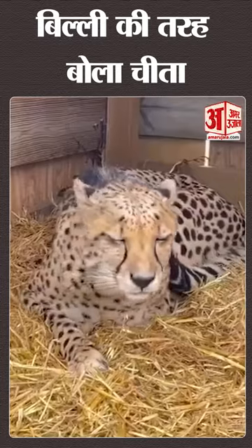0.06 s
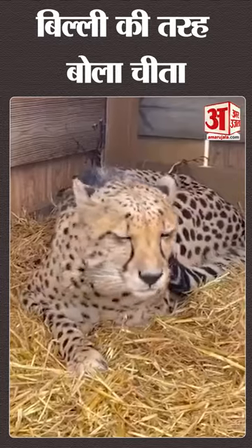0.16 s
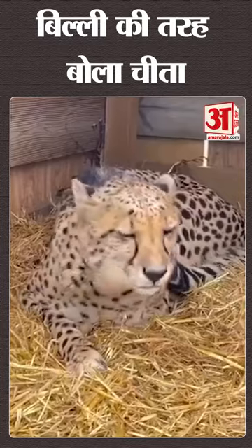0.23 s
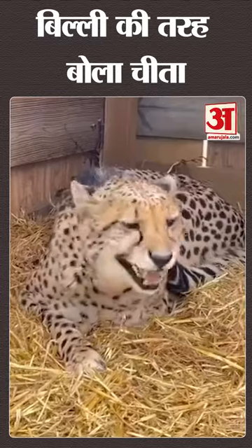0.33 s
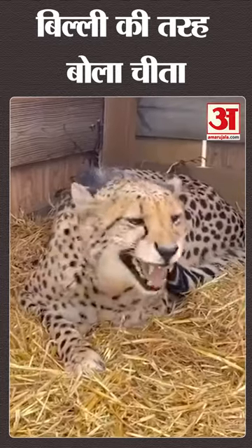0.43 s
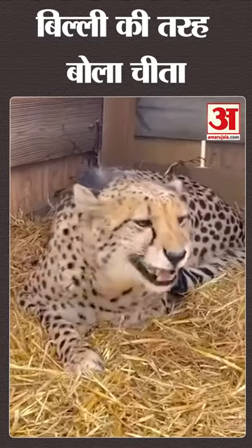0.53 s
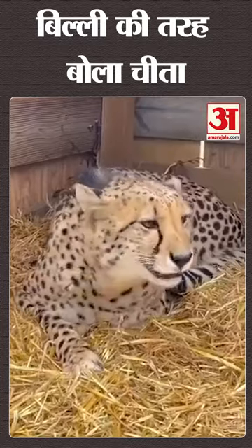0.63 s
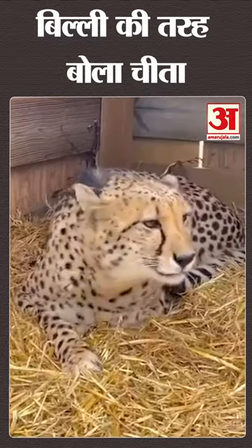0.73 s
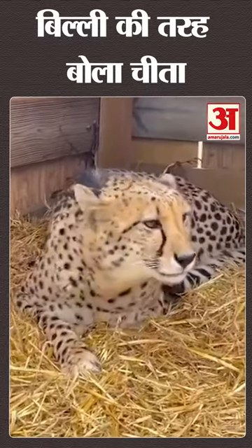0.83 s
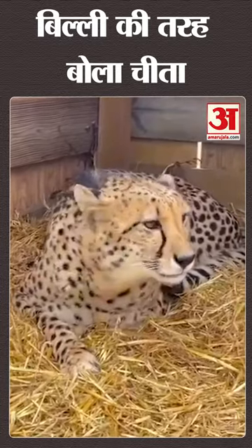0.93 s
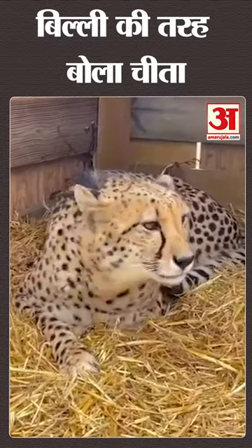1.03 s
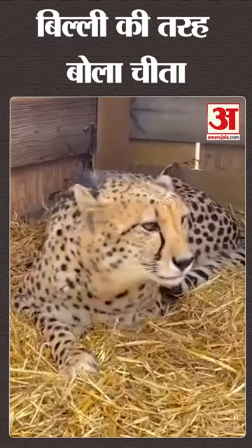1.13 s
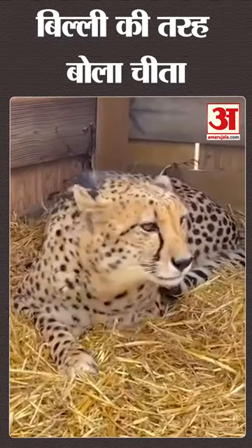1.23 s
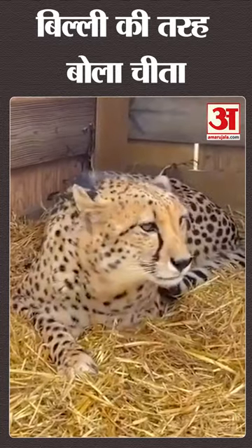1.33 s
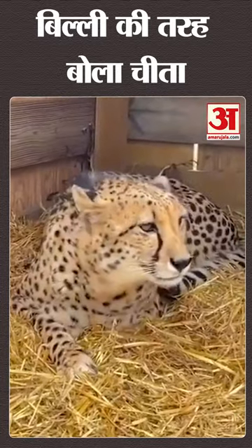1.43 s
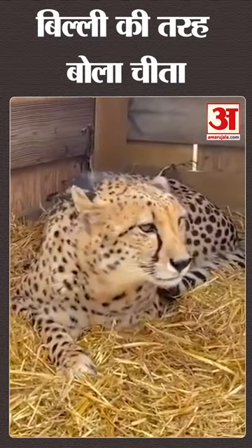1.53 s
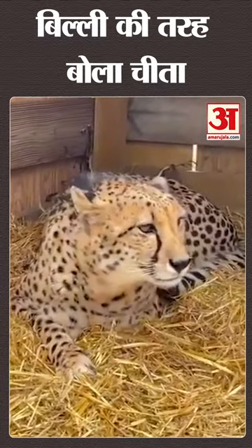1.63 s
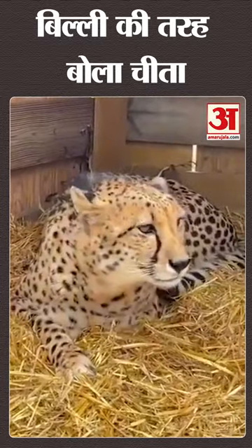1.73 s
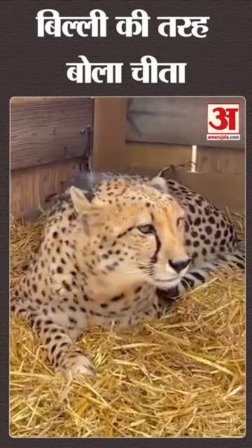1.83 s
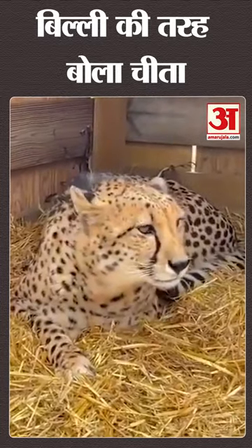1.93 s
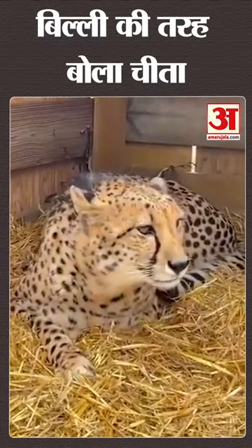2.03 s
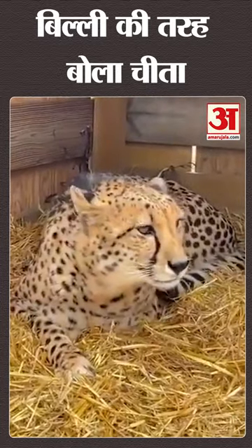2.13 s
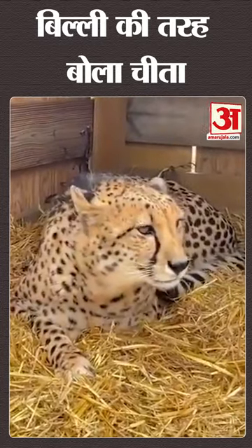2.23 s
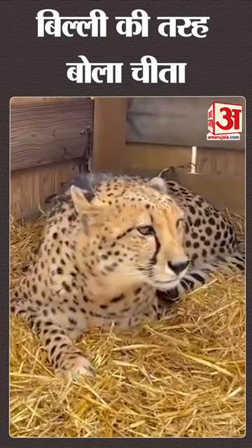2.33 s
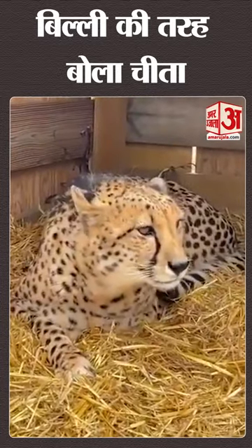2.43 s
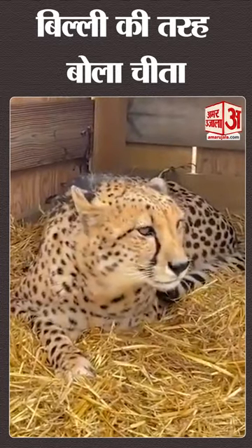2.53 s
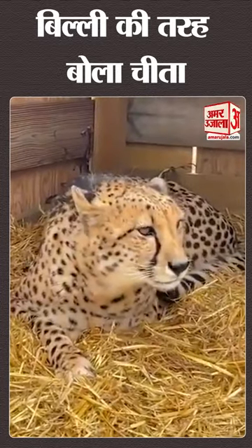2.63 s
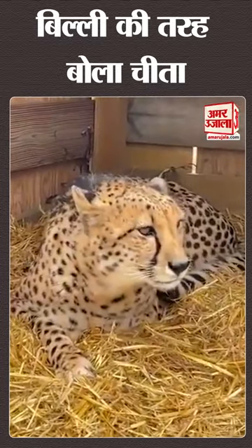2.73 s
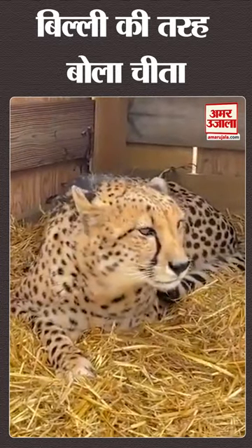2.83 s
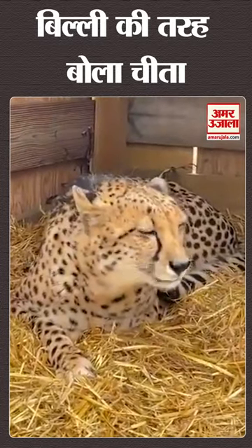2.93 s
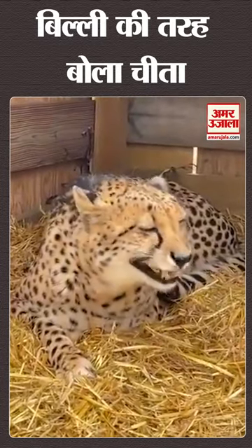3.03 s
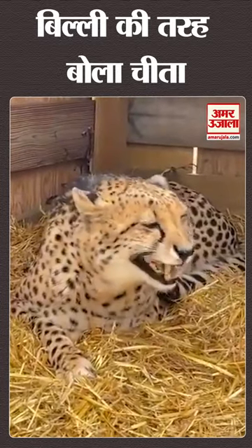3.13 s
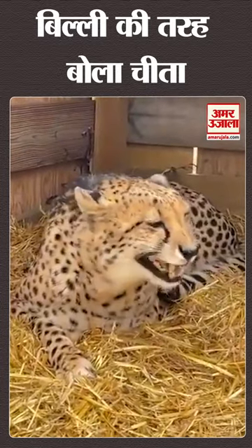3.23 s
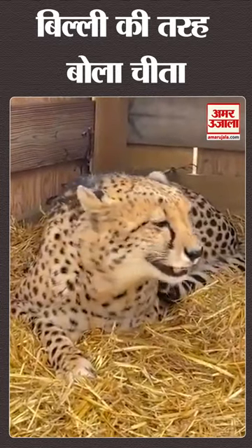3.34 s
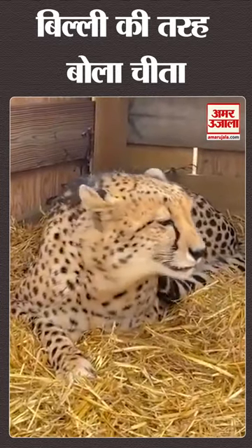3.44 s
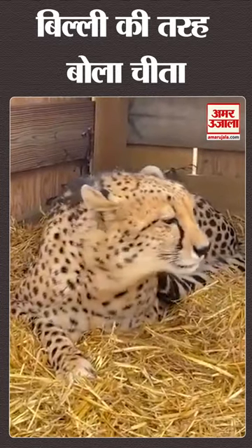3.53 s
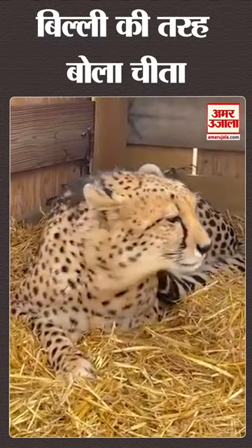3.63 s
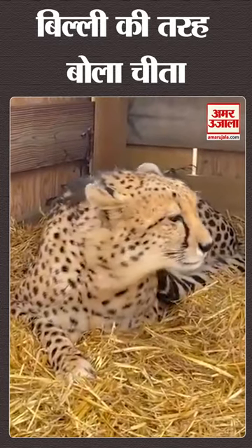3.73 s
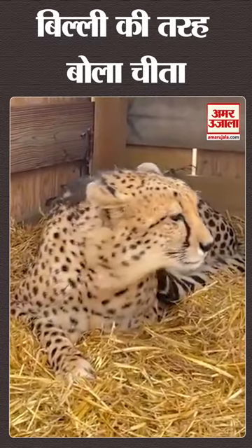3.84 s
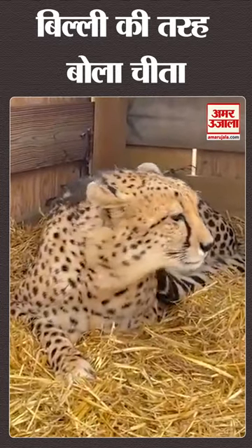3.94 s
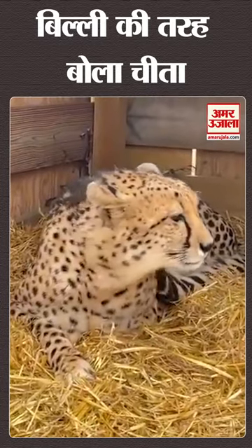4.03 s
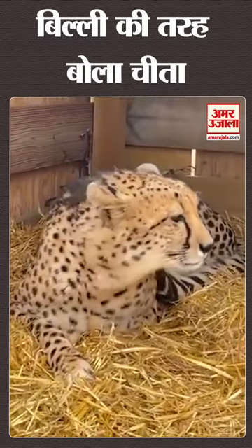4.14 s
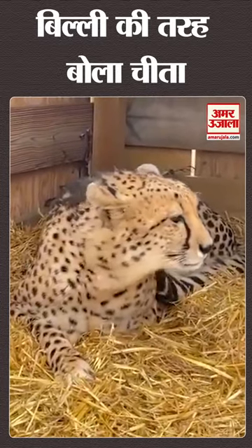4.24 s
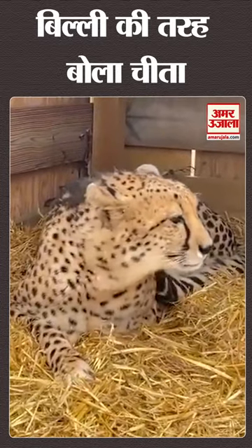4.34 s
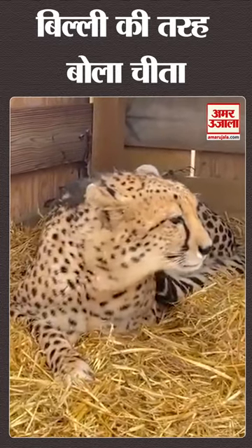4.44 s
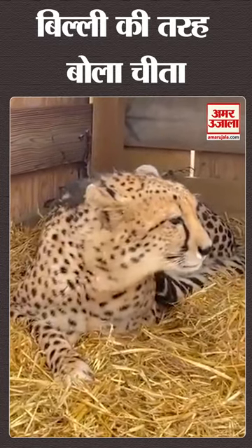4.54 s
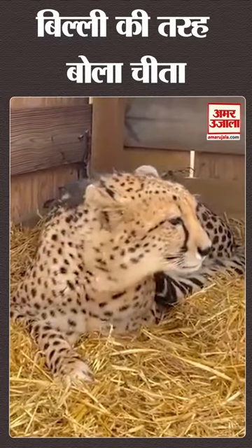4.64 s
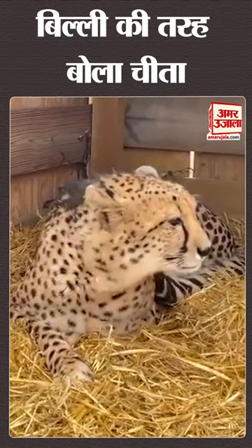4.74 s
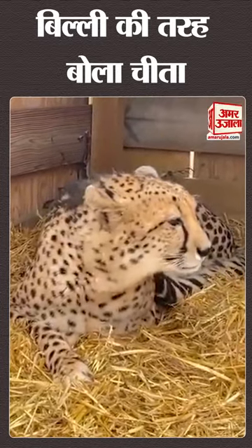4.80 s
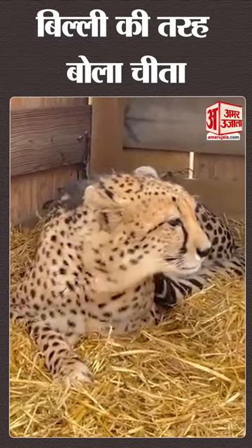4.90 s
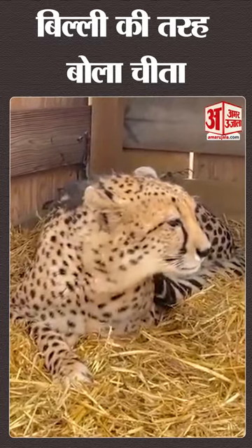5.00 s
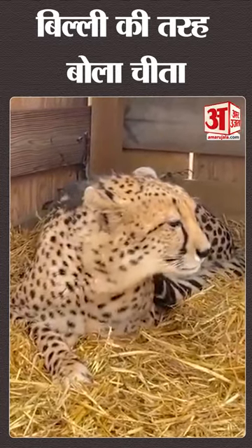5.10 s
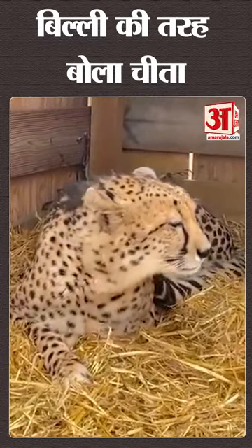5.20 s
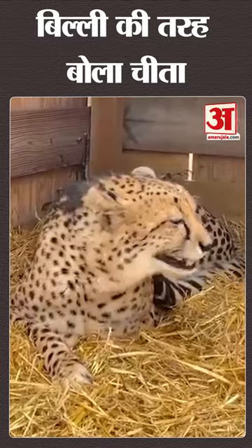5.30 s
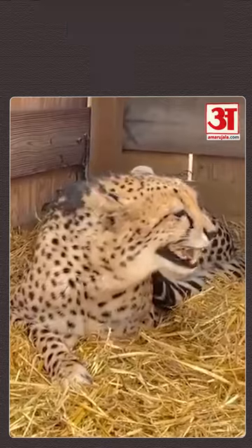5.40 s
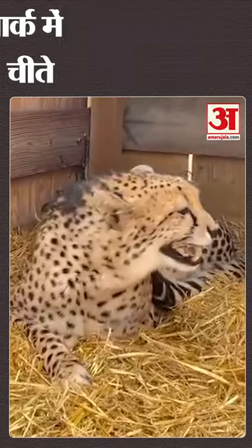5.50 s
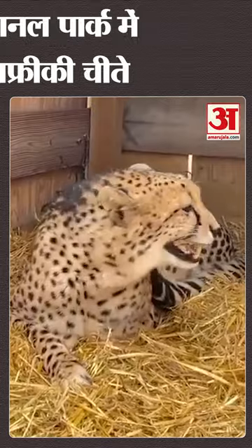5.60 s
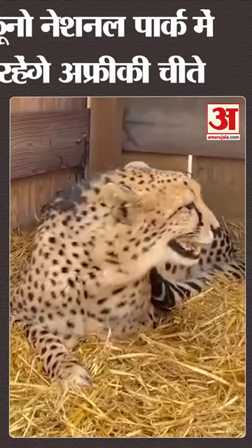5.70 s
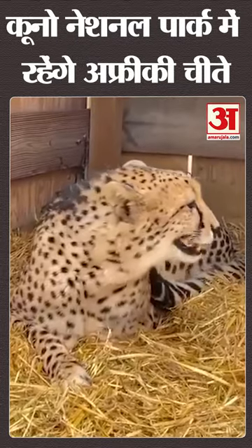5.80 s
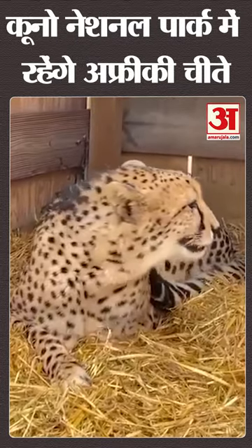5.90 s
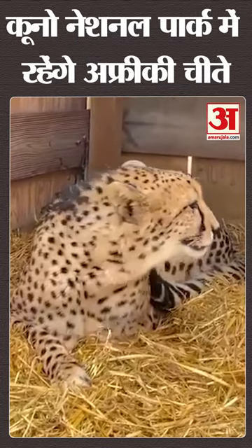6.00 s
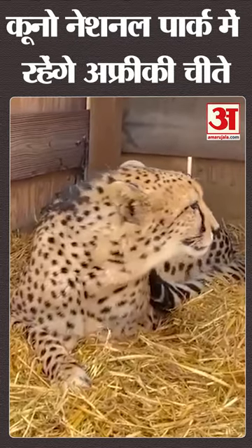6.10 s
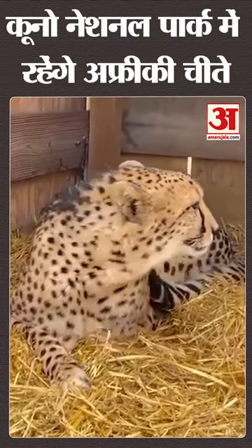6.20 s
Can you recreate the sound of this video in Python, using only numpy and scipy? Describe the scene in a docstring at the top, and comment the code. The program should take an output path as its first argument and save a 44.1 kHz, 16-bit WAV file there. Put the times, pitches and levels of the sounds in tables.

```python
"""A cheetah meows in a stall

A cheetah lying on straw gives three thin meows, each arching and then sliding down as its mouth closes.
Its vocal folds make a tone, its breath adds a rasp, and its throat and mouth shape both.
Beneath them a muffled rumble, most likely an engine beyond the wall, runs down from a drone
to a slow thudding idle. The straw stirs faintly, and the wooden boards throw the calls back."""
import sys
import numpy as np
from scipy import signal
from scipy.fft import rfft, irfft
from scipy.io import wavfile
from scipy.ndimage import uniform_filter1d

SR = 44100
rng = np.random.default_rng(int(sys.argv[2]) if len(sys.argv) > 2 else 0)


def transcribe(u):
    """Save the signal u as a 16-bit wav file named by the first command-line argument.

    u: samples, shape (n,) or (channels, n), limited to [-1, 1]; the rate is SR.
    q: integer samples, one column per channel.
    """
    v = np.clip(np.atleast_2d(u).T, -1, 1)
    q = np.round(v * 32767).astype(np.int16)
    wavfile.write(sys.argv[1], SR, q)


N = 276066
TIME = np.arange(N) / SR
TOP_HZ = 13100
USUAL_HZ, USUAL_DB = 600, -20  # pitch and level of an ordinary meow

# The engine slowing to idle: time_s, cycles_per_s
ENGINE_SPEED = [(0, 30.2), (.15, 28.6), (2.15, 21.0), (3.3, 13.75), (4.0, 11.52), (5.0, 10.17),
                (6.26, 10.13)]
# Tones at 2 to 6 times the engine speed, before the building shapes them: level_db
DRONE_LEVELS = [-25.5, -26, -20.5, -21.5, -31]
# What comes through the wall: frequency_hz, gain_db
THROUGH_WALL = [(15, -52.5), (30, -20.5), (50, -3.5), (85, -1.5), (105, -7), (130, -9), (165, -21),
                (230, -23), (350, -43.5), (700, -73.5), (2000, -102)]
# A broad rush that dies away as the engine slows: time_s, level_db
RUSH_FADE = [(0, -40), (1.05, -43), (2.0, -59.5), (3.6, -63), (6.26, -81)]
# The colour of that rush: frequency_hz, gain_db
RUSH_SPECTRUM = [(60, -18), (200, 5), (300, 0), (500, -14.5), (750, -22.5), (1500, -23.5), (2200, -28.5),
                 (3200, -39), (7000, -51.5), (13000, -61)]
# The colour of the still air: frequency_hz, gain_db
AIR_SPECTRUM = [(100, -4.5), (500, 1.5), (900, -5.5), (1500, -6), (2300, -10.5), (4500, -13), (7000, -15),
                (9000, -20), (11300, -14.5), (13000, -27)]
# Each stir of the straw: start_s, length_s, level_db, centre_hz, width_octaves
STRAW_STIRS = [(0.278, 0.021, -45.5, 635, 0.53), (2.597, 0.5, -68, 1190, 0.17),
               (3.013, 0.12, -54.5, 11870, 0.12), (3.246, 0.2546, -60.5, 11870, 0.1),
               (5.646, 0.026, -51, 292, 0.7)]
# How long the stall's echo takes to fall by 60 dB: frequency_hz, decay_s
ECHO_DECAY = [(300, 0.3), (1200, 0.3), (3000, 0.26), (8000, 0.24)]
# The tune of the meows, one list each: time_s, pitch_hz
MEOW_PITCH = [
    [(0.666, 812), (0.695, 734.4), (0.73, 834), (0.762, 813.6), (0.805, 657), (0.87, 554.3), (0.975, 684.6),
     (1, 662), (1.025, 554)],
    [(3.308, 566.3), (3.35, 550.3), (3.405, 654.4), (3.48, 690.6), (3.56, 607), (3.62, 552.8), (3.69, 534),
     (3.77, 496), (3.81, 418.7)],
    [(5.672, 749), (5.693, 623.5), (5.742, 766.6), (5.8, 676), (5.87, 600), (5.94, 565.8), (6.01, 550),
     (6.15, 535.3), (6.26, 412.6)],
]
# How hard the cat calls, one list per meow: time_s, level_db, mouth_opening (0 shut, 1 wide)
MEOW_EFFORT = [
    [(0.666, -44.5, 1), (0.678, -30.5, 0.8), (0.735, -21.5, 0.95), (0.782, -16.5, 0.87), (0.818, -9, 0.76),
     (0.858, -16.5, 0.62), (0.928, -41, 0.54), (0.99, -36.5, 0.8), (1.03, -35.5, 0.08), (1.07, -57.0, 0.44)],
    [(3.308, -48.5, 0.46), (3.34, -24.5, 0.47), (3.46, -15.5, 0.94), (3.54, -12.5, 0.77),
     (3.69, -16.0, 0.64), (3.753, -32, 0.4), (3.785, -22.0, 0.1), (3.803, -34.5, 0.27), (3.827, -22.5, 0),
     (3.89, -67.5, 0.02)],
    [(5.672, -39, 0.67), (5.705, -19, 0.69), (5.79, -29.5, 0.64), (5.825, -24.5, 0.55), (5.86, -18.5, 0.57),
     (6.09, -18, 0.95), (6.135, -29, 0.32), (6.168, -21.5, 0.42), (6.208, -36, 0.35), (6.245, -18.5, 0.07)],
]
# Each meow's colour: bright_db, ring_db, squeal_hz, squeal_db, rasp_db, extra_starting_rasp_db
MEOW_COLOURS = [(-1, 19.5, 4750, 22.5, -26.5, 3.5), (-2.5, 12.5, 5130, 15, -32.5, 14),
                (-9.5, 13, 5590, 27.5, -41, 27)]
# The unchanging colour of the voice box and throat: frequency_hz, gain_db
THROAT_SPECTRUM = [(400, 10), (800, -2), (1500, 0), (2100, -5), (2500, -11), (3200, -17), (3800, -35),
                   (4500, -29), (5400, -29), (6500, -30), (7500, -32), (8600, -44), (10800, -31),
                   (13000, -39)]
# The colour of the rasp compared with the tone: frequency_hz, gain_db
RASP_SPECTRUM = [(250, -16), (500, -5), (800, -16.5), (1500, -1), (2500, 9.5), (3200, 9), (3900, 2),
                 (5200, 11.5), (6300, 15.5), (7300, 2.5), (9000, -3), (12000, 11)]


def gain_of(db):
    """Turns decibels into a number to multiply by."""
    return 10 ** (np.asarray(db) / 20)


def unit_level(x):
    """Scales a signal to an average (rms) level of one."""
    return x / np.sqrt(np.mean(x ** 2) + 1e-20)


def look_up(table, hz):
    """Reads a table at any frequency, blending its rows on a scale of octaves."""
    f, value = np.transpose(table)
    return np.interp(np.log(hz + 1), np.log(f + 1), value)


def follow(table, t):
    """Reads each column of a timed table at the times t."""
    times, *columns = np.transpose(table)
    return [np.interp(t, times, column) for column in columns]


def add(mix, start_s, sound):
    """Lays a sound into the mix."""
    part = mix[max(round(start_s * SR), 0):][:len(sound)]
    part += sound[:len(part)]


def noise(colour):
    """Noise shaped by colour, a function from Hz to dB."""
    gain = gain_of(colour(np.fft.rfftfreq(N, 1 / SR)))
    return unit_level(irfft(rfft(rng.standard_normal(N)) * gain, N))


def waver(hz, size=N, step=32):
    """A smooth random wobble of about size one, mostly slower than hz."""
    slow = rng.standard_normal(N // step + 2)
    f = np.fft.rfftfreq(len(slow), step / SR)
    slow = unit_level(irfft(rfft(slow) / np.sqrt(1 + (f / hz) ** 4), len(slow)))
    return np.interp(np.arange(size) / step, np.arange(len(slow)), slow)


def peak(hz, centre_hz, width_hz):
    """The bell shape of a resonance (a band that rings), one at its centre."""
    return 1 / (1 + (2 * (hz - centre_hz) / width_hz) ** 2)


def engine_drone(speed, cycles, boom_hz=108, full_speed_hz=25.82, even_firing_hz=23.16):
    """Tones at multiples of the engine speed sweep through the building's boom and fade as it slows."""
    fade = gain_of(-1.55 * np.maximum(full_speed_hz - speed, 0))
    imbalance = np.tanh((speed - even_firing_hz) / 2.6)  # even firing cancels the odd low tones
    low = np.zeros(N)
    for k, db in enumerate(DRONE_LEVELS, 2):
        boom_db = -10 * np.log2(k * speed / boom_hz) ** 2
        strength = gain_of(db + boom_db + 1.5 * waver(8)) * (imbalance if k % 2 else 1)
        wall_shift = 1.85 * (k - 4.3) ** 2  # the wall delays each tone differently, smoothing the drone
        low += strength * np.cos(2 * np.pi * k * cycles + wall_shift)
    high = sum(gain_of(look_up(THROUGH_WALL, k * speed)) * np.cos(2 * np.pi * (k * cycles + rng.random()))
               for k in range(7, 13))
    return np.sqrt(2) * fade * low + gain_of(-47) * unit_level(high * fade)


def engine_thuds(speed, cycles, uneven_db=2.2, dull_hz=150, delay_s=0.0115, dip_s=3.4):
    """One blow of uneven force per cycle, muffled by the wall; the level dips briefly."""
    force = gain_of(uneven_db * np.clip(rng.standard_normal(N), -1.5, 1.5)) / np.sqrt(speed)
    blows = np.diff(np.floor(cycles), prepend=0) * force
    hz = np.fft.rfftfreq(N, 1 / SR)
    muffle = gain_of(look_up(THROUGH_WALL, hz)) / (1 + (hz / dull_hz) ** 2)
    delay = np.exp(-2j * np.pi * hz * delay_s)
    dip_db = -17.5 * np.exp(-((TIME - dip_s) / 0.34) ** 2)
    level_db = -40 + 0.02 * (speed - speed[-1]) + dip_db
    return unit_level(irfft(rfft(blows) * muffle * delay, N)) * gain_of(level_db)


def engine(idle_rumble_db=-47):
    """As the engine slows, its drone gives way to single thuds and its rumble and rush sink."""
    speed, = follow(ENGINE_SPEED, TIME)
    cycles = np.cumsum(speed) / SR
    drone = engine_drone(speed, cycles)
    thuds = engine_thuds(speed, cycles)
    rumble = noise(lambda hz: look_up(THROUGH_WALL, hz)) * gain_of(idle_rumble_db) * speed / speed[-1]
    rush = noise(lambda hz: look_up(RUSH_SPECTRUM, hz)) * gain_of(follow(RUSH_FADE, TIME)[0] + waver(25))
    return drone + thuds + rumble + rush


def still_air(level_db=-70):
    """The faint, steady hiss of the air."""
    return gain_of(level_db) * noise(lambda hz: look_up(AIR_SPECTRUM, hz))


def straw(length_s, level_db, centre_hz, width_octaves):
    """Stalks rub together in a soft swell of noise in one band."""
    size = int(length_s * SR)
    rubbing = noise(lambda hz: -4 * (np.log2((hz + 1) / centre_hz) / width_octaves) ** 2)[:size]
    return gain_of(level_db) * rubbing * np.hanning(size)


def stall(sound, near_db=-14, tail_db=-23, bounces_per_s=2500):
    """Adds quick echoes from the boards, then a short tail that the straw soaks up."""
    t = np.arange(SR // 2) / SR
    bounces = rng.choice([-1., 1.], len(t)) * (rng.random(len(t)) < bounces_per_s / SR) * (t > .003)
    near = bounces * np.exp(-t / 0.0097)
    hz, age, bands = signal.stft(bounces, SR, nperseg=256)
    decay = gain_of(-60 * age / look_up(ECHO_DECAY, hz)[:, None])
    tail = signal.istft(bands * decay, SR, nperseg=256)[1][:len(t)]
    echo = gain_of(near_db) * near / np.linalg.norm(near) + gain_of(tail_db) * tail / np.linalg.norm(tail)
    return sound + signal.fftconvolve(sound, echo)[:N]


def throat(hz, age_s, pitch, level_db, mouth, colour):
    """How many dB the throat and mouth boost or cut each frequency as they move."""
    bright_db, ring_db, squeal_hz, squeal_db = colour
    tension, push_db = pitch / USUAL_HZ, level_db - USUAL_DB
    # two vowel resonances rise as the mouth opens
    low_hz = np.interp(mouth, [0, 1], [407, 1589])
    high_hz = np.interp(mouth, [0, 1], [1394, 1937]) * tension ** .68
    vowel = 21.5 * peak(hz, low_hz, 520) + 18 * peak(hz, high_hz, 240)
    ring_hz = 2900 * tension ** .3
    ring = (ring_db + 0.82 * push_db) * peak(hz, ring_hz, 480)
    notch = -12 * peak(hz, ring_hz + 680, 420)
    squeal = squeal_db * peak(hz, squeal_hz * tension ** -0.16, 900)
    hiss = 15 / tension ** 2 * peak(hz, 6300, 900)  # shows as the pitch sinks
    # a louder, higher call is brighter, and the treble swells just after the start
    treble = bright_db + 0.17 * push_db + 27 * np.log2(tension) - 13 * np.exp(-age_s / 0.0098)
    treble = treble * np.clip(hz / 2000 - 1, 0, 1)
    return look_up(THROAT_SPECTRUM, hz) + vowel + ring + notch + np.maximum(squeal, hiss) + treble


def breath_rasp(phase, start_s, tune, effort, colour, puff_depth=0.67):
    """Swirling breath passes through the throat, one puff for each opening of the vocal folds."""
    size = len(phase)
    puffs = rng.standard_normal(N)[:size] * (1 + puff_depth * np.cos(phase))
    hz, age, bands = signal.stft(puffs, SR, nperseg=512, noverlap=384)
    t = start_s + age
    throat_db = throat(hz[:, None], age, *follow(tune, t), *follow(effort, t), colour)
    shape = gain_of(throat_db + look_up(RASP_SPECTRUM, hz)[:, None])
    bands = bands * shape / np.linalg.norm(shape, axis=0)
    return unit_level(signal.istft(bands, SR, nperseg=512, noverlap=384)[1][:size])


def meow(tune, effort, colour_row, settle_s=0.33, harmonics=26):
    """Vibrating vocal folds make harmonics (multiples of the pitch), shaped by the throat, plus rasp."""
    *colour, rasp_db, starting_rasp_db = colour_row
    t = np.arange(effort[0][0], max(tune[-1][0], effort[-1][0]), 1 / SR)
    age, size = t - t[0], len(t)
    level_db, mouth = follow(effort, t)
    pitch = uniform_filter1d(follow(tune, t)[0], size=700)
    # the voice is roughest as it starts and where it is weak
    rough_db = rasp_db + starting_rasp_db * np.exp(-age / settle_s)
    rough_db = np.minimum(rough_db - 0.76 * (level_db - USUAL_DB), 0)
    # a fast slide of pitch unsettles the folds, and rough folds run less evenly
    octaves_per_s = abs(np.gradient(np.log2(pitch))) * SR
    slide = np.minimum(uniform_filter1d(octaves_per_s, size=1300), 4)
    rough_db += 3 * slide * np.clip(-rough_db / 20 - 1.5, 0, 1)
    pitch *= 1 + .002 * waver(40, size)
    pitch *= 1 + .053 * gain_of(rough_db) * waver(100, size)
    phase = 2 * np.pi * np.cumsum(pitch) / SR
    k = np.arange(1, harmonics + 1)[:, None]
    hz = k * pitch
    # the folds never close the same way twice: low harmonics stay nearly clean, high ones smear
    smear = np.array([waver(170, size) for _ in k])
    smear *= (.6 + .2 * slide) * np.clip((hz - 1750) / 3800, .04, 1)
    flicker_db = 1.97 * np.array([waver(22, size) for _ in k])
    waves = np.cos(k * phase + smear + 2 * np.pi * rng.random(k.shape))
    strengths = gain_of(throat(hz, age, pitch, level_db, mouth, colour) + flicker_db) * (hz < TOP_HZ)
    tone = np.sqrt(2) * (strengths * waves).sum(0) / np.linalg.norm(strengths, axis=0)
    voice = tone + gain_of(rough_db) * breath_rasp(phase, t[0], tune, effort, colour)
    return t[0], voice * gain_of(level_db + waver(22, size)) * signal.windows.tukey(size, .01)


def scene():
    """The cat and its straw in the stall, over the engine and still air."""
    cat = np.zeros(N)
    for tune, effort, colour_row in zip(MEOW_PITCH, MEOW_EFFORT, MEOW_COLOURS):
        add(cat, *meow(tune, effort, colour_row))
    for start_s, *stir in STRAW_STIRS:
        add(cat, start_s, straw(*stir))
    return (stall(cat) + engine() + still_air())[None]


def record(dry):
    """Cuts away the treble above TOP_HZ."""
    low_pass = signal.firwin(511, TOP_HZ, window=("kaiser", 9), fs=SR)
    return signal.oaconvolve(dry, low_pass[None], "same")


dry = scene()
out = record(dry)
transcribe(out)
```